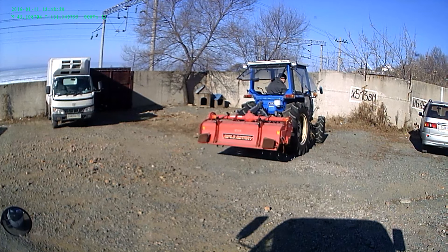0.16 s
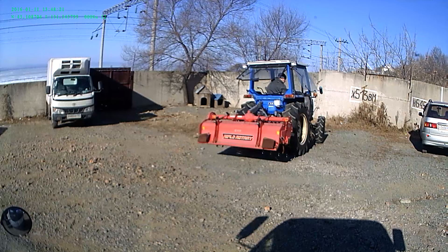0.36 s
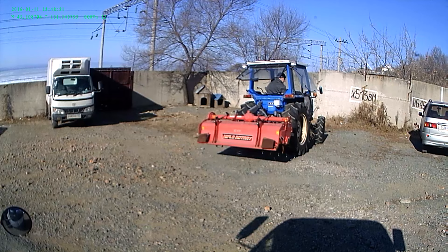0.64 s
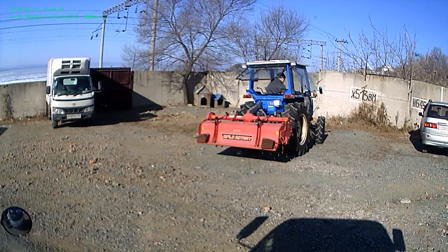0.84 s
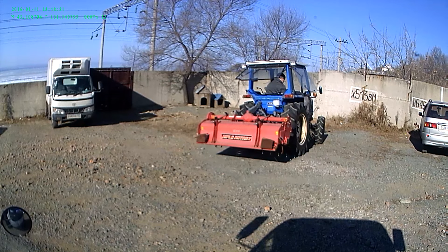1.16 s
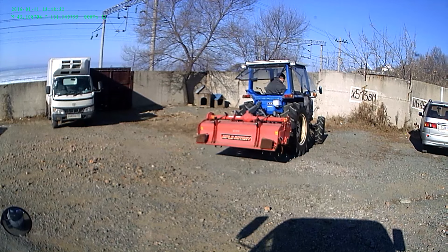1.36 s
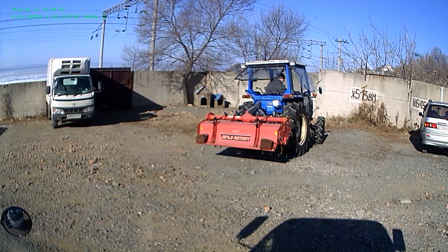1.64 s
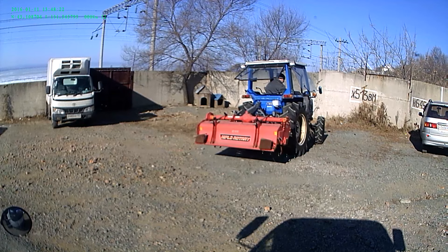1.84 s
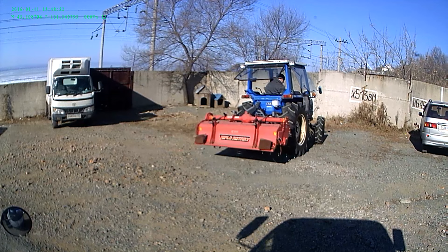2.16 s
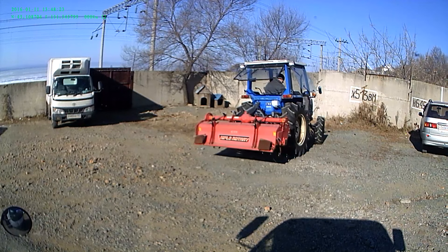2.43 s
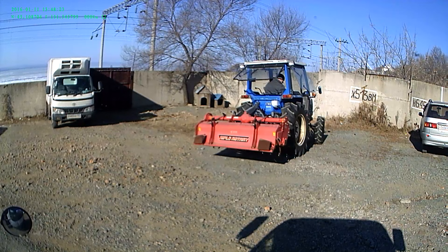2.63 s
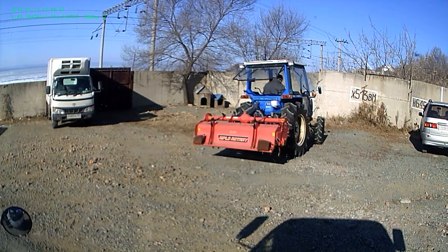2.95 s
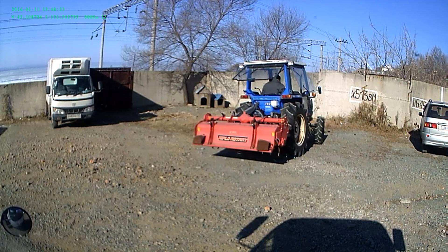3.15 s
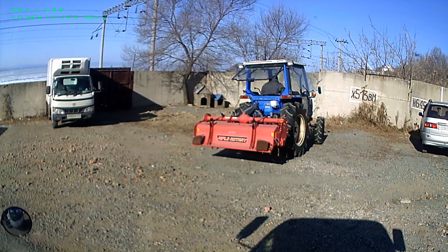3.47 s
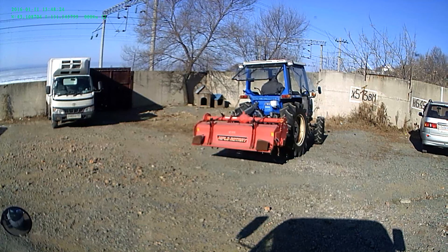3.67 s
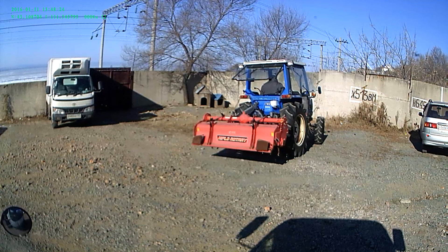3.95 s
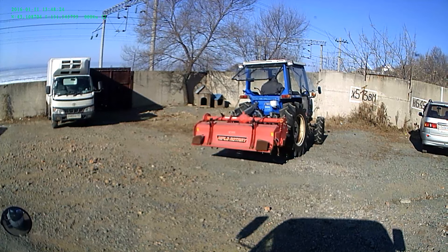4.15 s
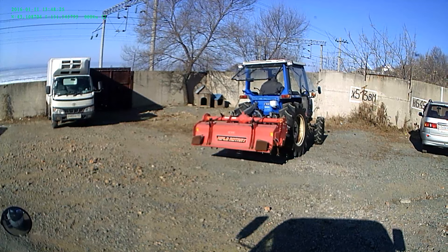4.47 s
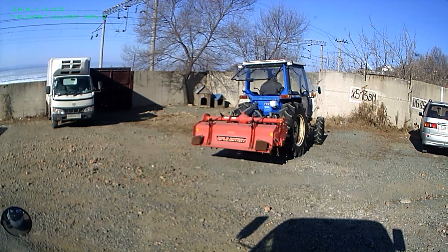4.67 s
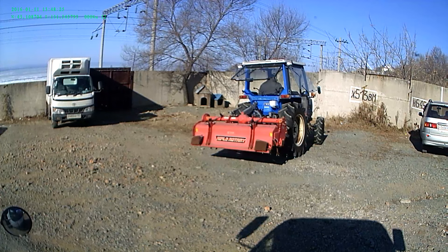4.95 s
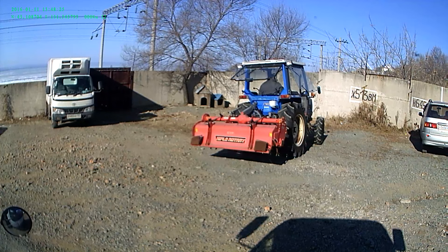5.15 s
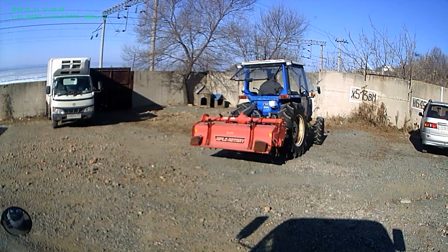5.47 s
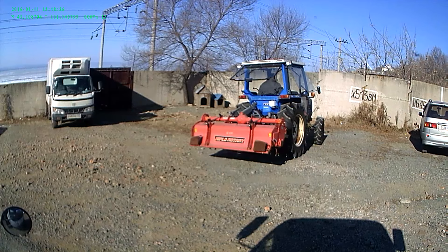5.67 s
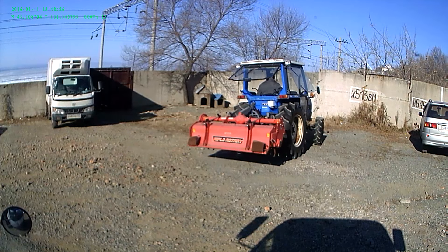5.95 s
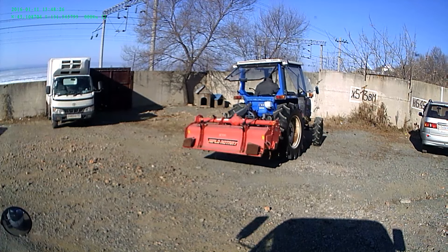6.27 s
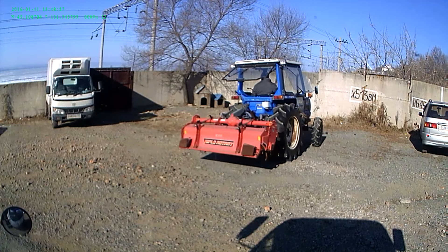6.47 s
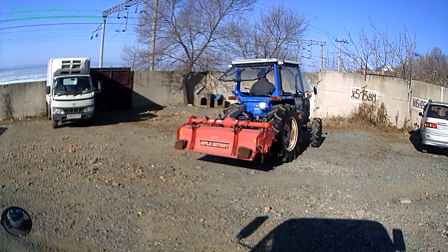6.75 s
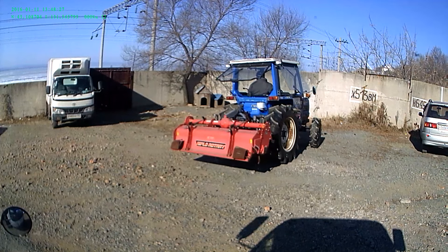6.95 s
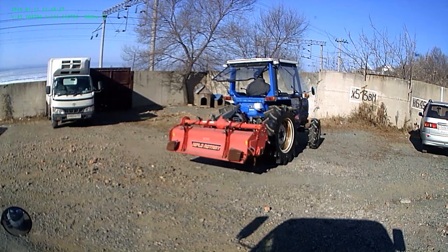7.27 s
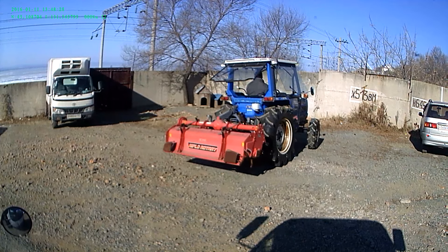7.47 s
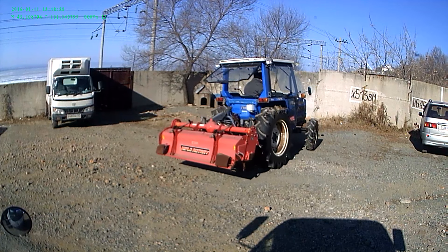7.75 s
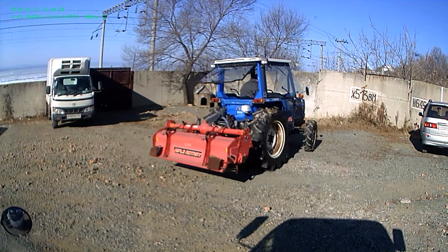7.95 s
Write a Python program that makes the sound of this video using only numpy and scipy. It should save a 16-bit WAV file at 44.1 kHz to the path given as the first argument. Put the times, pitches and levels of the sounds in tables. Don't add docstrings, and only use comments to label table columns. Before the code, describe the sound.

Knocking diesel idle with close, intermittent lens buzz and hiss; after five seconds the engine labours, metal linkage bangs and the tractor approaches.

```python
import sys
import numpy as np
from scipy import signal
from scipy.fft import rfft, irfft, next_fast_len
from scipy.io import wavfile
from scipy.ndimage import uniform_filter1d, map_coordinates

SR = 44100
rng = np.random.default_rng(int(sys.argv[2]) if len(sys.argv) > 2 else 0)


def generate_wav(sig):
    pcm = np.round(np.clip(np.atleast_2d(sig).T, -1, 1) * 32767).astype(np.int16)
    wavfile.write(sys.argv[1], SR, pcm)


def gain_from_decibels(decibels):
    exponent = np.asarray(decibels, float) / 20
    return 10 ** exponent


N = 357651
T = np.arange(N) / SR

# time_s, firings_per_s
ENGINE_SPEED = [(0, 27.85), (1, 28.08), (3.2, 28.21), (3.5, 28.57), (5.345, 28.79), (5.435, 21.8),
                (5.8, 21.35), (6.28, 21.9), (6.4, 22.55), (6.52, 24.0), (6.64, 26.2), (7.0, 26.3),
                (7.12, 27.05), (7.3, 27.25), (7.72, 27.05), (8.11, 27.35)]
# multiple_of_firing, level_db
WEAK_ORDERS = [(.75, -68), (1.25, -65), (1.5, -66), (1.75, -58), (2.25, -63), (3, -58), (4, -66), (5, -70),
               (10, -63), (30, -70), (48, -66), (66, -72)]
PUMP_ORDERS = (20, 21, 35, 50)
# centre_hz, width_hz, level_db
PUMP_PANELS = [(574, 3, -57), (592, 3.5, -57.5), (985.5, 2, -58.5), (1435, 8, -58)]
CYLINDER_KNOCK = [-9, -6, 0, -6]
# centre_hz, width_hz, level_db
BLOCK_IDLE = [(188.5, 36.4, 2), (244, 25.5, 3), (300.6, 26, 4.5), (418.5, 54, -2.5), (477.5, 18, -0.5),
              (516, 30, 1.5), (597.5, 9.1, 4.5), (760, 184, -9.5), (1003.5, 7.8, 0.5), (1100, 20.5, -3),
              (1300, 28, -1.5), (1445, 15, 0), (1559, 57, -2), (1738, 80, -8), (2161, 42, -11.5)]
# centre_hz, width_hz, level_db
BLOCK_LOAD = [(260, 62, -8.5), (473, 22, -7), (528, 27, 4), (690, 41, -5.5), (750, 41, 0.5), (1036, 153, 2),
              (1123, 9.5, 10.5), (1254, 47, -0.5), (1351, 34, 9.5), (1415, 150, 0), (1591, 24, 6),
              (1703, 51, -3.5), (1946, 43, -13), (2283, 75, -8)]
# pitch_hz, level_db (per Hz)
RUMBLE = [(12, -41), (30, 1.5), (60, -4.5), (110, -13), (250, -17), (1500, -14), (1900, -22), (3000, -27.5),
          (6000, -22.5), (11000, -71)]
# centre_hz, width_hz, level_db
PISTON_WALLS = [(1340, 50, -9), (1585, 45, 0), (1980, 40, -24), (2400, 40, -28), (3400, 1200, -40)]
# centre_hz, width_hz, level_db
LINERS = [(1400, 150, -12), (1980, 30, 0), (2400, 35, -3)]
LINER_CYLINDERS = [-1, 0, -4, -3]
# multiple_of_firing, centre_hz, width_hz, level_db
BONNET = [(4, 105, 2, -60), (10, 272, 8, -57)]
# start_s, stop_s, turns_per_s
LENS_RUNS = [
    (-.1, .789, 52.84),
    (1.357, 2.957, 52.74),
    (3.684, 5.256, 53.07),
    (5.387, 5.769, 52.7),
    (5.806, 7.403, 53.03),
]
# place_in_turn (0-1), level_db
LENS_STEPS = [(.0, 0), (.21, -.5), (.48, -1), (.82, -3)]
# harmonic, level_db
COIL_HARMONICS = [(1, -20), (2, 0), (3, -20)]
# centre_hz, width_hz, level_db
LENS_HOUSING = [(3544, 380, -10.5), (4796, 164, -7.5), (5786, 200, -4), (6540, 164, 0), (6830, 110, 0.5),
                (6940, 140, -11), (10680, 140, -11)]
# pitch_hz, level_db (per Hz)
SERVO = [(2200, -71), (3000, -29), (3800, -16.5), (4700, -18), (5100, -22.5), (6300, -5), (6900, -9.5),
         (7400, -8), (8050, -24.5), (8500, -6), (8800, 4), (9300, -9), (10300, -14.5), (11600, -27)]
# pitch_hz, level_db
WHINE = [(5185, -69), (8478, -68), (8507, -67)]
# start_s, peak_db (after the camera's gain), pitch_hz, rattle_db
CLANKS = [(1.213, -31.5, 1526, -8), (1.574, -31, 458, -4), (5.45, -25, 1005, 5), (5.452, -28, 482, -9),
          (5.56, -27, 495, -6), (5.589, -22.5, 996, -6), (5.639, -27, 295, -2), (5.69, -25, 516, 7),
          (5.705, -20, 983, 6.5), (5.716, -23.5, 473, -2), (5.74, -30, 760, -6), (5.899, -25, 468, -5),
          (6.019, -21, 1267, -4), (6.067, -29, 340, -2), (6.099, -18.5, 331, 2), (6.189, -20, 1000, 3),
          (6.227, -15, 474, 2), (6.346, -9.5, 327, 4), (6.488, -13, 740, 3), (6.602, -17, 716, -3),
          (6.775, -20.5, 1300, 11.5), (6.817, -9.5, 650, -8), (6.975, -13, 1350, -4),
          (7.178, -14.5, 1100, 6.5), (7.554, -23.5, 479, 10)]
# start_s, peak_db (after the camera's gain), pitch_hz, t60_s, rattle_db
CHASSIS = [
    (5.385, -28, 48, 0.22, -20),
    (6.3473, -4.5, 1226, .033, 0),
    (7.846, -10, 681, 0.024, -1.5),
    (7.848, -27, 486, 0.18, -2),
]
# centre_hz, width_hz, level_db
LINKAGE = [(190, 50, -3), (325, 60, -3), (480, 45, 1), (720, 110, -2), (1025, 90, -1.5), (1290, 90, -6),
           (1600, 90, -5), (2150, 400, -18)]
# pitch_hz, level_db
GEARS = [(1757, -56), (2399, -67)]
GAIN_STEPS = [(0, 2), (8, 1), (12, 2), (20, 1), (26, 2), (30, 1), (38, 2), (50, 1), (52, 2), (60, 1),
              (64, 2), (70, 1), (78, 2), (82, 1), (90, 2), (102, 1), (103, 2), (112, 1), (129, 4), (160, 2),
              (168, 1)]

CLUTCH_S, BITE_S = 5.33, .12
START_M, PULL_M_PER_S2 = 13.3, 1.26


def unit(x):
    return x / np.sqrt(np.mean(x ** 2) + 1e-20)


def wobble(rate):
    return map_coordinates(rng.standard_normal(int(N * rate / SR) + 4), [T * rate])


def filtered(x, response):
    m = next_fast_len(N + SR // 2)
    return irfft(rfft(x, m) * response(np.fft.rfftfreq(m, 1 / SR)), m)[:N]


def modes(rows):
    def response(f):
        total = 0
        for k, (centre, width, db) in enumerate(rows):
            damping = 1j * f * width
            total = total + (-1) ** k * gain_from_decibels(db) * damping / (centre * centre - f * f + damping)
        return total
    return response


def colour(points):
    hz, db = np.transpose(points)
    return lambda f: gain_from_decibels(np.interp(np.log(f + 1), np.log(hz), db, left=-120, right=-120))


def bursts(turns, life, scatter_db, pattern_db=(0,)):
    at = np.flatnonzero(np.diff(np.floor(turns)) > 0)
    place = np.floor(turns[at + 1]).astype(int) % len(pattern_db)
    size_db = np.array(pattern_db)[place]
    kicks = np.zeros(N)
    kicks[at] = gain_from_decibels(size_db + scatter_db * rng.standard_normal(len(at)))
    return signal.lfilter([1], [1, -np.exp(-1 / (life * SR))], kicks)


def peak_db(hz, centre_hz, width_hz):
    return -20 * np.log10(1 + ((hz - centre_hz) / width_hz) ** 2)


def tone(turns, order, db, lag):
    return np.sqrt(2) * gain_from_decibels(db) * np.cos(2 * np.pi * order * turns + lag)


def drive():
    since = np.clip(T - CLUTCH_S, 0, None)
    metres = np.clip(START_M - PULL_M_PER_S2 * since ** 2 / 2, 1, None)
    return since, np.clip(since / BITE_S, 0, 1), 20 * np.log10(START_M / metres)


def exhaust(turns, speed):
    _, load, near_db = drive()
    settling_db = 6.5 * np.exp(-T / 0.33)
    bog_db = 1.0 * (speed - speed[0])
    first_db = -46.5 + settling_db + near_db + load * (10 + bog_db)
    swell_db = near_db + load * (9 + peak_db(2 * speed, 48, 4.57))
    first_lag = np.interp(T, [3.1, 3.5], [2.7, 3.6])
    out = tone(turns, 1, first_db + .9 * wobble(7), first_lag)
    out += tone(turns, 2, -43.5 + swell_db + .5 * wobble(6), 0)
    for order, db in WEAK_ORDERS:
        out += tone(turns, order, db + .7 * swell_db + 1.3 * wobble(3), 1.3 * order)
    return out


def pump(turns, speed):
    _, load, _ = drive()
    out = np.zeros(N)
    for order, (hz, width, db) in zip(PUMP_ORDERS, PUMP_PANELS):
        level_db = db + peak_db(order * speed, hz, width) - 15 * load + 1.5 * wobble(5)
        out += tone(turns, order, level_db, order)
    return out


def valve_clatter(turns, count):
    once = irfft(np.exp(2j * np.pi * rng.random(count)), 16 * count)
    return unit(np.interp(turns % 1, np.arange(len(once)) / len(once), once, period=1))


def block(turns):
    since, load, near_db = drive()
    knock = unit(bursts(turns + .02, life=.008, scatter_db=1.5, pattern_db=CYLINDER_KNOCK))
    valves = valve_clatter(turns, count=100)

    def shake(depth):
        return unit((1 + depth * knock) * gain_from_decibels(0.11 * wobble(13)) * rng.standard_normal(N))

    idle = unit(filtered(shake(depth=.2) + .45 * valves, modes(BLOCK_IDLE)))
    loaded = unit(filtered(shake(depth=.45) + .3 * valves, modes(BLOCK_LOAD)))
    rumble = unit(filtered(shake(depth=0.019), colour(RUMBLE)))
    strain_db = -4 * np.exp(-since / 0.39)
    loaded_db = -44 + strain_db + 0.9 * near_db
    return gain_from_decibels(-46.5) * idle + load * gain_from_decibels(loaded_db) * loaded + gain_from_decibels(-50.5 + 2 * load) * rumble


def pistons(turns):
    _, load, near_db = drive()
    rap = unit(bursts(turns + .02, life=.009, scatter_db=1, pattern_db=CYLINDER_KNOCK))
    rap = rap * rng.standard_normal(N)
    rap += .7 * unit(bursts(turns - .04, life=.00005, scatter_db=1, pattern_db=CYLINDER_KNOCK))
    return gain_from_decibels(-56 + 2 * load + 1.2 * near_db) * unit(filtered(rap, modes(PISTON_WALLS)))


def liners(turns):
    _, load, near_db = drive()
    ping = unit(bursts(turns + .05, life=.007, scatter_db=2.5, pattern_db=LINER_CYLINDERS))
    ring = unit(filtered(ping * rng.standard_normal(N), modes(LINERS)))
    return load * gain_from_decibels(-59 + 2.7 * near_db) * ring


def bonnet(turns, speed):
    _, load, near_db = drive()
    out = np.zeros(N)
    for order, hz, width, db in BONNET:
        level_db = db + near_db + peak_db(order * speed, hz, width) + 1.2 * wobble(3)
        out += tone(turns, order, level_db, 1.3 * order)
    return load * out


def engine():
    time_s, firings_per_s = np.transpose(ENGINE_SPEED)
    speed = np.interp(T, time_s, firings_per_s)
    turns = np.cumsum(speed * (1 + .0012 * wobble(8))) / SR
    tones = exhaust(turns, speed) + pump(turns, speed) + bonnet(turns, speed)
    return tones + block(turns) + pistons(turns) + liners(turns)


def lens_motor(turns, running):
    steps = np.zeros(N)
    count = np.zeros(N, int)
    for place, db in LENS_STEPS:
        steps += gain_from_decibels(db) * bursts(turns - place, life=.0028, scatter_db=1.2)
        count += np.floor(turns - place + 1).astype(int)
    steps = uniform_filter1d(steps, size=30) * running
    slips = np.cumsum(.75 * rng.standard_normal(N // 100))
    phase = 2 * np.pi * 3510 * T + slips[count]
    coil = unit(steps * sum(gain_from_decibels(db) * np.sin(k * phase) for k, db in COIL_HARMONICS))
    rattle = unit(filtered(steps * rng.standard_normal(N), modes(LENS_HOUSING)))
    return gain_from_decibels(0.66) * (gain_from_decibels(-50) * coil + gain_from_decibels(-53.5) * rattle)


def servo(turns, running):
    frame = unit(bursts(25 * T + .8, life=.016, scatter_db=2))
    frame += .4 * unit(bursts(100 * T + .35, life=.002, scatter_db=4))
    tick = unit(bursts(turns - .66, life=.0013, scatter_db=2))
    effort = (1 + 0.9 * frame) * gain_from_decibels(-4 * running + 0.12 * wobble(5.6)) + 0.33 * tick * running
    return gain_from_decibels(-48.5) * unit(filtered(effort * rng.standard_normal(N), colour(SERVO)))


def lens():
    running, turns = np.zeros(N), np.zeros(N)
    for start, stop, rate in LENS_RUNS:
        inside = (T > start) & (T < stop)
        running[inside] = 1
        turns[inside] = (T[inside] - start) * rate
    whine = sum(gain_from_decibels(db) * np.sin(2 * np.pi * hz * T) for hz, db in WHINE)
    return lens_motor(turns, running) + servo(turns, running) + whine


def recorder_gain():
    number, factor = np.transpose(GAIN_STEPS)
    starts = number * 2048 + 250
    return factor[np.searchsorted(starts, np.arange(N), "right").clip(1) - 1]


def clanks():
    own, rattle, t = np.zeros(N + SR), np.zeros(N + SR), T[:SR // 5]
    gain = recorder_gain()
    blows = [(s, db, hz, 0.07 * (500 / hz) ** 0.33, rattle_db) for s, db, hz, rattle_db in CLANKS]
    for s, db, hz, t60, rattle_db in blows + list(CHASSIS):
        i = round(s * SR)
        blow = gain_from_decibels(db) / gain[i] * (1 - np.exp(-t / .0008))
        own[i:i + len(t)] += 0.57 * blow * gain_from_decibels(-60 * t / t60) * np.sin(2 * np.pi * hz * t)
        rattle[i:i + len(t)] += blow * gain_from_decibels(rattle_db + 3 - 60 * t / .06) * rng.standard_normal(len(t))

    def heavy(f):
        return modes(LINKAGE)(f) / (1 + 1j * f / 1900) ** 2

    return own[:N] + gain_from_decibels(2.0) * filtered(rattle[:N], heavy)


def chatter():
    since, load, _ = drive()
    slack = unit(gain_from_decibels(4 * wobble(30)) * rng.standard_normal(N))
    snatch_db = 12.5 * np.exp(-since / 0.29)
    return load * gain_from_decibels(-47.5 + snatch_db) * unit(filtered(slack, modes(LINKAGE)))


def yard(x):
    tail = rng.standard_normal(SR // 3) * gain_from_decibels(-60 * T[:SR // 3] / .25)
    return signal.fftconvolve(np.pad(x, (700, 0)), tail / np.linalg.norm(tail))[:N]


def gears():
    whirr = np.zeros(N)
    for hz, db in GEARS:
        phase = 2 * np.pi * np.cumsum(hz + 7 * wobble(40)) / SR
        whirr += gain_from_decibels(db + 4 * wobble(20)) * np.sin(phase)
    return gain_from_decibels(5.5 + 64 * np.minimum(T - 6.9, 0)) * whirr


def scene():
    linkage = clanks() + chatter()
    return (engine() + lens() + linkage + gain_from_decibels(-11) * yard(linkage) + gears())[None]


def top_cut(x):
    return signal.sosfilt(signal.butter(12, 11710, fs=SR, output="sos"), x)


def record(dry):
    offset = -.0143
    stepped = (dry[0] + offset) * recorder_gain()
    heard = filtered(stepped, lambda hz: 1 / (1 + (hz / 11400) ** 90))
    return top_cut(heard[None])


dry = scene()
out = record(dry)
generate_wav(out)
```